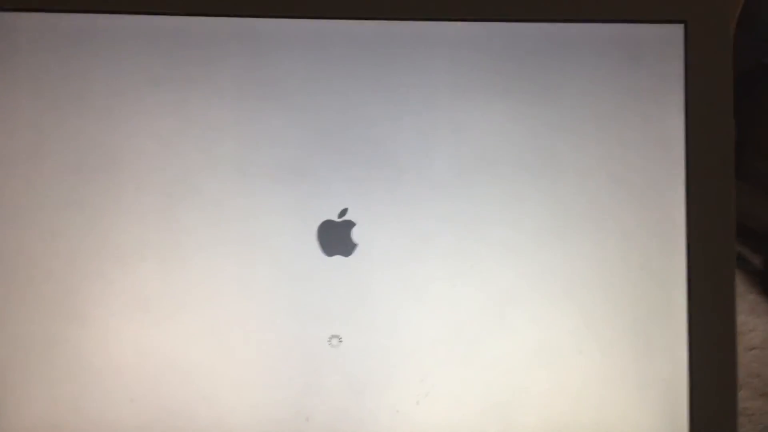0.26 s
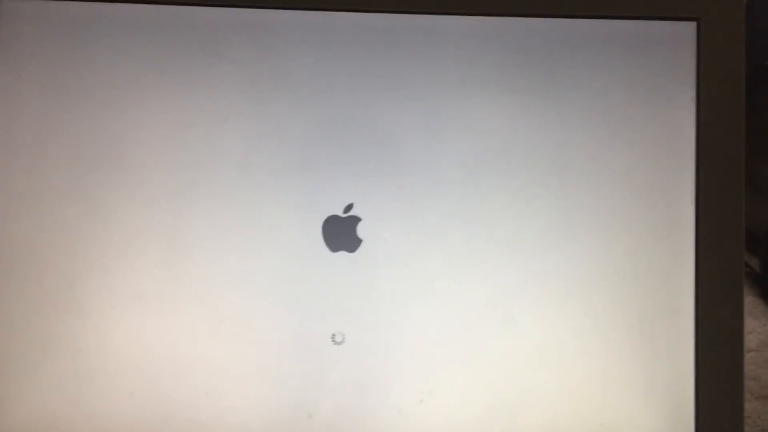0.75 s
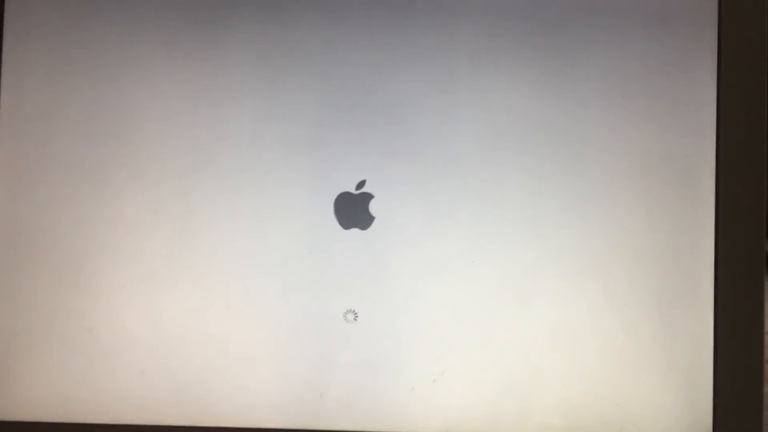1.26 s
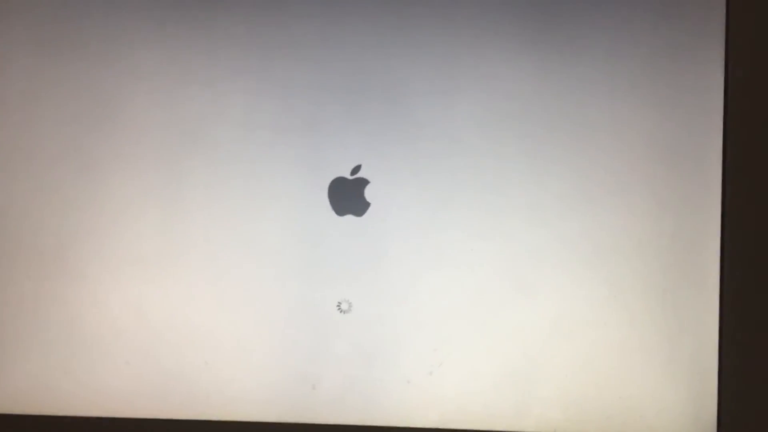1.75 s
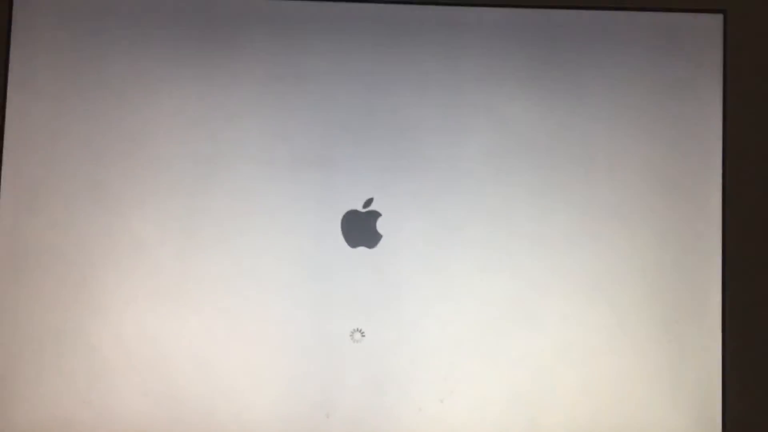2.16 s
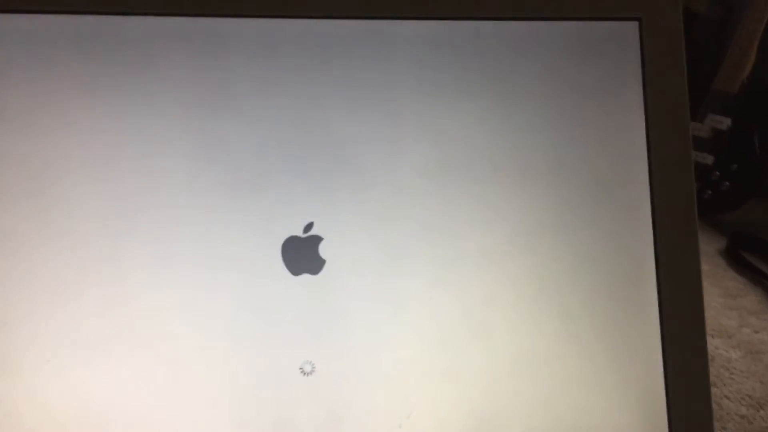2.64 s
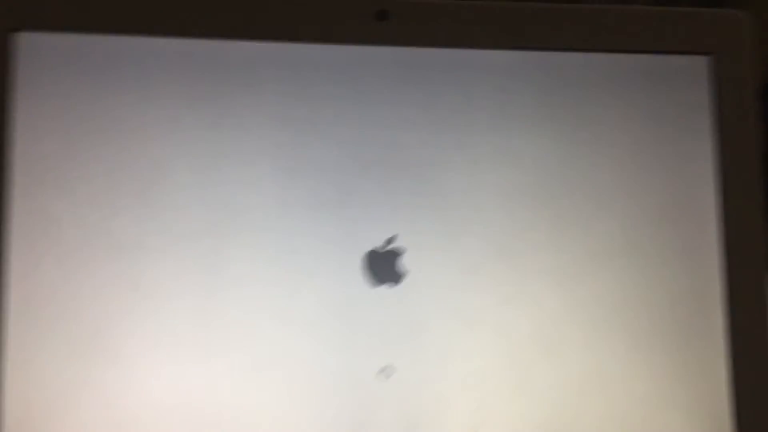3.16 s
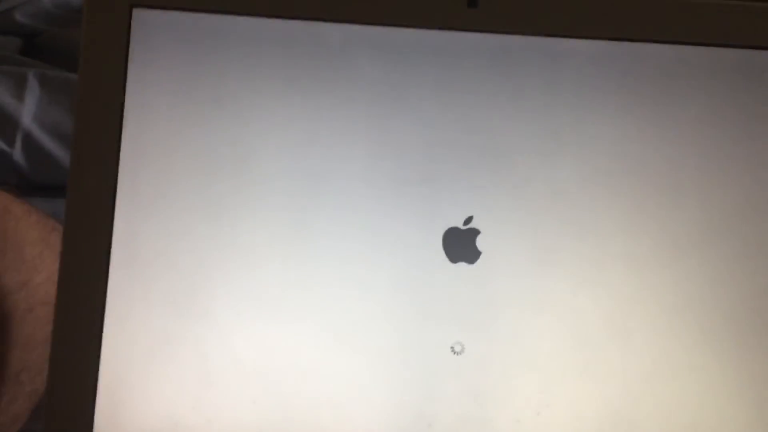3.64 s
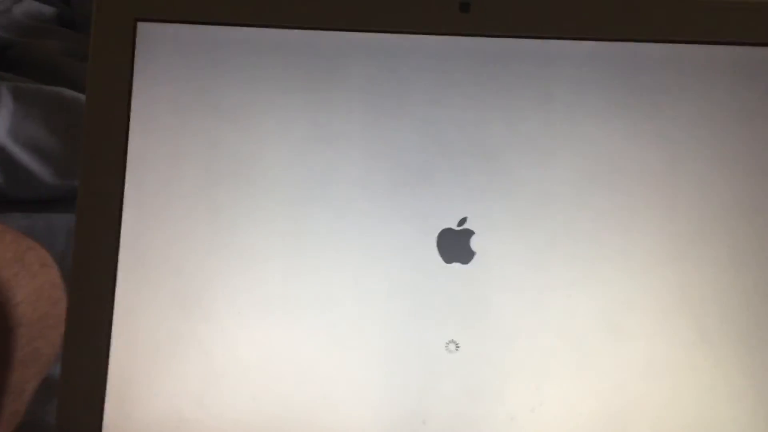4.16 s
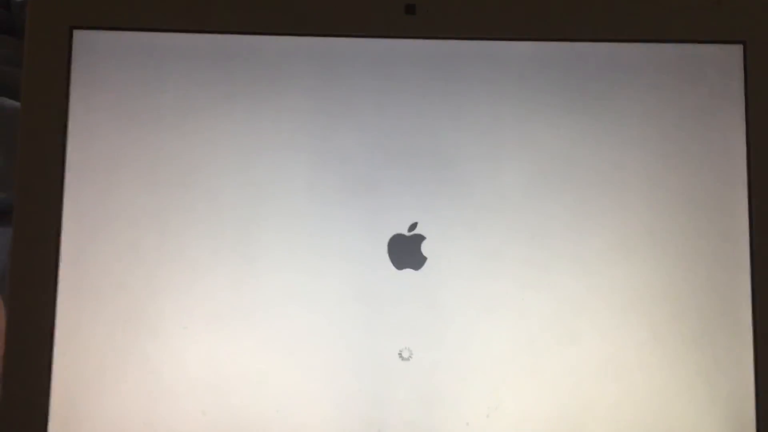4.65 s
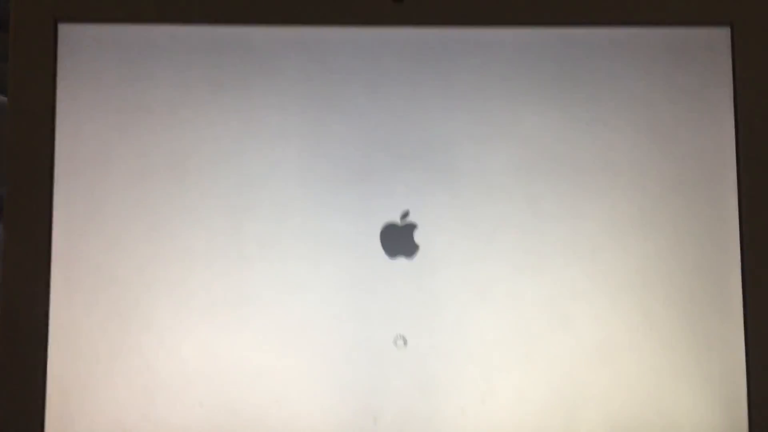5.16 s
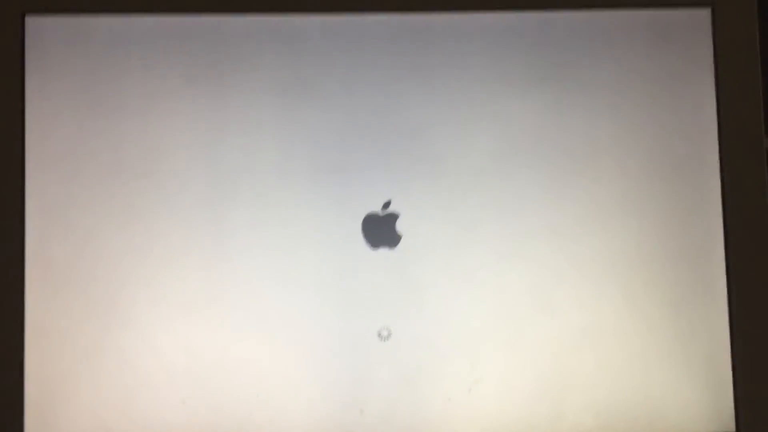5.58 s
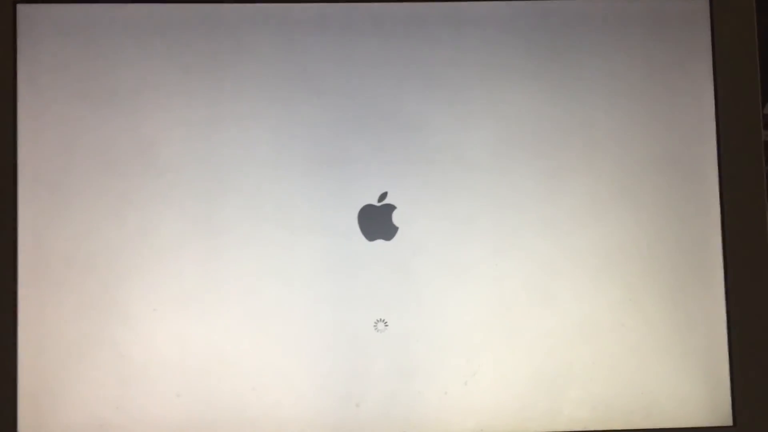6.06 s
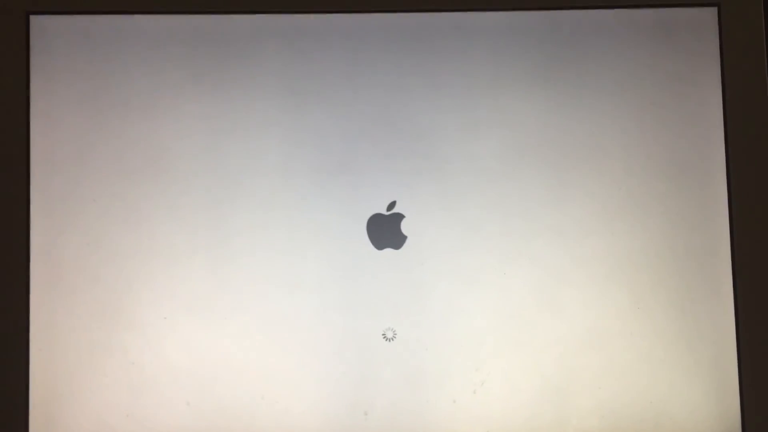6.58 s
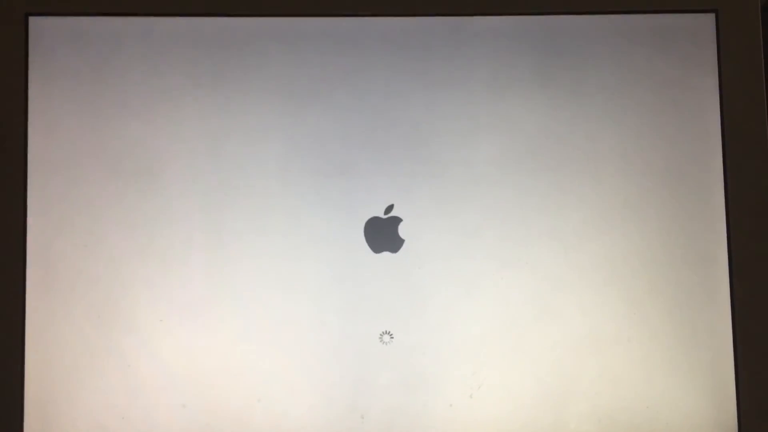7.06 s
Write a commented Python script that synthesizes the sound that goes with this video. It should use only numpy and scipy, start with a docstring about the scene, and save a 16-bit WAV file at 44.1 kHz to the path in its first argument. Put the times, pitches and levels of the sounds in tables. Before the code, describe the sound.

A worn laptop fan runs close to the microphone, humming and rattling in a fast, even pattern as it rubs its housing. The case rings with a buzzy tone and fine, hissing ticks. The rubbing turns briefly rougher several times as the laptop is tilted. Behind it are a steady rush of vent air and a faint hard drive whine, with a few small handling clicks and soft bumps in the first half.

```python
"""A worn laptop fan hums and rattles close by, in a pattern that repeats 16 times a second.
Its spinning part, the rotor, rubs and strikes the housing: the case rings and the treble ticks.
Tilting the laptop makes it rub harder, and the balance shifts as a hand-held camera moves around it.
Behind the fan are the hiss of air in the vent, the steady tones of the hard drive,
and a few small clicks and soft bumps from handling."""
import sys
import numpy as np
from scipy import signal
from scipy.fft import rfft, irfft, next_fast_len
from scipy.io import wavfile
from scipy.ndimage import uniform_filter1d, map_coordinates

SR = 44100
rng = np.random.default_rng(int(sys.argv[2]) if len(sys.argv) > 2 else 0)


def unload_wav(signal):
    """Save mono or channel-first audio to the path in sys.argv[1] as 16-bit WAV at rate SR, clipped to [-1, 1]."""
    wavfile.write(
        sys.argv[1],
        SR,
        np.round(np.clip(np.atleast_2d(signal).T, -1, 1) * 32767).astype(np.int16),
    )


N = 322812

# A cycle is one round of the rattle pattern: five turns of the rotor.
# The rubs in a cycle: (place in the cycle [0-1], relative knock level [dB], relative tick level [dB])
RUBS = [(0.074, -15.5, -7.5), (0.126, -12, -6), (.21, -5.5, -2), (.279, -7, -5.5), (.311, -7, -7.5),
        (.408, 4, 2.5), (0.448, -0.5, -7), (0.483, -9.5, -5.5), (0.531, -7, -19), (0.608, 1, 0),
        (.648, -1.5, -5), (.683, -6, -3), (0.713, -5, -6), (.854, -11, -7), (0.88, -4, -4.5),
        (.92, -22, -20)]
CALM_CHANCE = 0.16  # how much of the rubbing is random between tilts, 0-1


def rattle(cycle):
    """The rotor's rubs make the case ring, with a different tone from the right and from the left."""
    # The case's ring from each side: (frequency [Hz], relative level [dB])
    case_right = [(60, -88), (200, -41), (600, -23), (850, -28.5), (970, -9), (1250, -17.5), (1430, -4),
                  (1560, -14.5), (1685, -6), (1750, -6), (1850, -8.5), (1950, -14.5), (2250, -12),
                  (2600, -30.5), (3000, -26), (3600, -37)]
    case_left = [(60, -85), (200, -34), (600, -16), (850, -15.5), (970, -12), (1130, -10.5), (1240, -13),
                 (1350, -5), (1590, -10), (1680, -8), (1850, -5.5), (1950, -5), (2250, -10.5),
                 (2600, -25.5), (3000, -34), (3600, -41.5)]
    places, knock_db, _ = np.transpose(RUBS)
    press_db, chance = tilting()
    left = leftward()
    grain = evened(roughness(cycle, chance, memory_cycles=34), 1 / 700)
    force = grain * pressure(cycle, places, knock_db, fade=0.023, rest_db=-12)
    ring = (1 - left) * coloured(force, case_right) + left * coloured(force, case_left)
    ring = evened(ring, 1 / 4)
    power = np.abs(uniform_filter1d(ring ** 2, size=SR // 250))
    softened = ring / (1 + power / 0.95) ** (1 / 3)  # the light rotor gives way, so no rub sticks out far
    return amp(-50 - 2.5 * left + 1.5 * press_db) * unit(softened)


def strikes(cycle):
    """The rotor hits the same spots every cycle: the case buzzes, knocks hollowly and snaps crisply."""
    # Each kind of hit: (place in the cycle [0-1], pitch [Hz], relative peak from the right [dB],
    # from the left [dB], in the dead spot [dB])
    buzz_hits = [(0.0031, 1732, -46, -45, -44), (0.0884, 1662, -45, -43, -41),
                 (0.1244, 1694, -43, -46, -49), (0.2201, 1759, -44, -45, -46),
                 (0.2946, 1771, -38, -43, -48), (0.4172, 1770, -40, -42, -40),
                 (0.4822, 1733, -39, -42, -41), (0.5601, 1679, -43, -43, -45),
                 (0.6186, 1750, -40, -42, -41), (0.6747, 1744, -39, -43, -41),
                 (0.7251, 1795, -46, -44, -44), (0.8972, 1805, -40, -43, -47),
                 (0.9253, 1802, -50, -48, -50)]
    knock_hits = [(0.2158, 1097, -49, -50, -51), (0.2729, 1417, -44, -44, -47),
                  (0.3747, 1144, -50, -48, -49), (0.4581, 1143, -39, -39, -40),
                  (0.5178, 1166, -52, -48, -47), (0.5687, 1133, -45, -46, -47),
                  (0.6378, 1061, -43, -43, -43), (0.6851, 1102, -45, -45, -48),
                  (0.8865, 1482, -39, -43, -46), (0.9533, 954, -49, -52, -51)]
    snap_hits = [(.418, 2650, -55, -58, -55), (.435, 2170, -47, -51, -50), (.62, 2820, -52, -55, -54)]
    left, dead = leftward() ** 2, dead_spot()

    def heard(hits):
        """Blend each hit's three levels by where the camera is."""
        return [(place, (1 - dead) * (right_db + left * (left_db - right_db)) + dead * dead_db, hz)
                for place, hz, right_db, left_db, dead_db in hits]

    buzz = bursts(cycle, heard(buzz_hits), half_s=.0016, scatter_db=1.03, drift=0.21, shake=2.9)
    knocks = bursts(cycle, heard(knock_hits), half_s=.0009, scatter_db=1.3, drift=0.27, shake=3.0)
    snaps = bursts(cycle, heard(snap_hits), half_s=.0009, scatter_db=0.8, drift=.7, shake=4.2)
    return amp(0.37) * buzz + amp(-1) * knocks + amp(-0.1) * snaps


def blade_hum(cycle):
    """The fan blades give a fluttering tone, weaker in a tilt, softer and purer in the dead spot."""
    # The tone's swells: (place in the cycle [0-1], relative level [dB], pitch [Hz])
    swells = [(.0068, 0, 579), (.1808, 0, 589), (.2834, -10, 520), (.3766, -1, 580), (.4714, -8, 615),
              (.6297, -6, 538), (.7791, -3, 571)]
    core_hz = (548, 572)
    _, chance = tilting()
    dead = dead_spot()
    blades = unit(bursts(cycle, swells, half_s=.0035, scatter_db=0.68, drift=0.028, shake=1.4))
    core = signal.sosfiltfilt(signal.butter(2, core_hz, "bandpass", fs=SR, output="sos"), blades)
    flutter = blades - core
    level_db = -50 - 1.03 * leftward() - 3.5 * dead - 5.5 * (chance - CALM_CHANCE)
    return amp(level_db) * (blades - 0.5 * dead * flutter)


def drone(cycle):
    """The unbalanced rotor drones; its tone at four times the turning rate is louder from the left."""
    # The drone's tones: (pitch [multiple of the cycle rate], level [dB])
    tones = [(15, -71), (17, -75), (18, -68), (19, -71), (24, -76.5), (25, -61.5), (26, -69.5), (27, -70),
             (45, -73.5), (49, -69), (50, -71.5), (60, -68.5)]
    body = rotor_tones(cycle, tones, waver_db=-0.3, drift=0.08)
    fourth = rotor_tones(cycle, [(20, -69.5)], waver_db=1.2, drift=0.055)
    return np.std(body) * evened(body, 1 / 35) + amp(4.5 * leftward() + 2.5 * dead_spot()) * fourth


def ticks(cycle):
    """Each rub also gives a short hissing tick, whose bright edge is heard mostly from the left."""
    # The tone of the tick and of its bright edge: (frequency [Hz], relative level [dB])
    tick_colour = [(100, -59), (1500, -5), (2800, 0.5), (3600, -5), (5500, 5), (7300, 0.5), (8500, -9.5),
                   (10000, -0.5), (11600, -1), (12500, -6), (15700, -18)]
    edge_colour = [(9000, -66), (11800, -12), (12700, -5), (13500, 0), (14300, -23), (15700, -11)]
    # The camera crosses the narrow beam in which the edge leaves the vent:
    # (time [s], half length [s], gain [dB])
    beam_passes = [(4.75, 0.48, 4), (7.15, .25, 4)]
    places, _, sizes_db = np.transpose(RUBS)
    press_db, _ = tilting()
    left = leftward()
    grit = rng.standard_normal(N) * amp(1.1 * wobble(60))
    tick = coloured(grit * pressure(cycle, places, sizes_db, fade=0.027, rest_db=-31), tick_colour)
    edge_force = pressure(cycle, places, sizes_db, fade=.04, rest_db=-15)
    edge = coloured(rng.standard_normal(N) * edge_force, edge_colour)
    tick_db = -65 + 2 * left + 0.89 * press_db
    edge_db = -85 + 14 * left + bells(beam_passes) - 7 * dead_spot()
    return amp(tick_db) * tick + amp(edge_db) * edge


def squeak(cycle):
    """One rub in every cycle gives a tiny high squeak of varying strength."""
    place, cycle_hz, pitch_hz, half_s = .217, 16, 11700, .0012
    from_peak_s = ((cycle - place + .5) % 1 - .5) / cycle_hz
    ring = unit(wobble(900) * np.sin(2 * np.pi * pitch_hz * np.arange(N) / SR))
    peak_db = -64 + 0.5 * leftward() + 2 * wobble(12)
    return amp(peak_db) * np.exp(-(from_peak_s / half_s) ** 2) * ring


def air():
    """Air rushes through the vent, with a thin high hiss straight in front of it."""
    # The tone of the rush and of the high hiss: (frequency [Hz], relative level [dB])
    rush_colour = [(20, -27), (55, -23), (100, -9.5), (160, 0), (350, 7), (1000, 6), (2700, 1), (3600, -7),
                   (4200, 0.5), (5200, 1.5), (6400, 1), (7500, -6), (8500, -16), (10000, -10), (13000, -20),
                   (15700, -22)]
    hiss_colour = [(6500, -39), (7200, -5), (7500, 14), (7800, 3), (8500, -34)]
    # The camera passes in front of the vent: (time [s], half length [s], level [dB])
    vent_passes = [(1.7, .6, -70), (4.75, 0.42, -70.5), (5.45, 0.36, -77)]
    rush_db = -55 - 0.22 * np.arange(N) / SR  # the camera drifts away from the vent
    rush = amp(rush_db) * coloured(rng.standard_normal(N), rush_colour)
    hiss_gain = sum(amp(db) * bell(s, half) for s, half, db in vent_passes)
    return rush + hiss_gain * coloured(rng.standard_normal(N), hiss_colour)


def hard_drive():
    """The drive hums and whines; its motor's whistle grows as the camera passes through its wide beam."""
    # Tones of the drive and the electronics: (pitch [Hz], level from the right [dB])
    whines = [(77.8, -79.5), (120, -82.5), (4765, -86), (7484, -88), (9745, -86)]
    whistle_hz = 3742
    t = np.arange(N) / SR

    def tone(hz):
        """A pure tone, less steady the higher it is."""
        return np.sqrt(2) * np.sin(2 * np.pi * hz * t + hz / 9000 * wobble(9))

    steady = sum(amp(db) * tone(hz) for hz, db in whines)
    whistle_db = -81 + 8 * bell(3.3, 2.4) + 1.2 * wobble(5.14)
    return amp(whistle_db) * tone(whistle_hz) + amp(-1.4 * leftward()) * steady


def handling():
    """Handling the case makes dry clicks and dull bumps."""
    # Clicks: (time [s], level [dB], centre pitch [Hz], width [octaves], time to fade by 60 dB [s])
    clicks = [(2.211, -41, 3900, .42, .016), (.882, -54.5, 12000, .4, .11), (1.108, -55.5, 4400, .15, .24)]
    # Bumps: (time [s], level [dB], pitch [Hz])
    bumps = [(.92, -54, 165), (1.15, -55, 150), (2.355, -49.5, 225)]
    out, t = np.zeros(N + SR), np.arange(SR // 4) / SR
    octave = np.log2(np.fft.rfftfreq(len(t), 1 / SR) + 1)
    for s, db, hz, width, fade_s in clicks:
        band = np.exp(-.5 * ((octave - np.log2(hz)) / width) ** 2)
        noise = irfft(rfft(rng.standard_normal(len(t))) * band, len(t))
        out[round(s * SR):][:len(t)] += unit(noise) * amp(db - 60 * t / fade_s)
    for s, db, hz in bumps:
        loudness = amp(db - 60 * t / 0.1) * (1 - np.exp(-t / 0.0033))
        out[round(s * SR):][:len(t)] += loudness * np.sin(2 * np.pi * hz * t)
    return out[:N]


def screen_echo(x, delay_s=0.001075, sway=0.16, echo_db=-15):
    """Add the echo off the screen; its path changes as the camera sways, shifting the tone of the hiss."""
    lag = delay_s * SR * np.exp(sway * wobble(1.3))
    return x + amp(echo_db) * map_coordinates(x, [np.arange(N) - lag], order=3)


def tilting():
    """Tilts press the rotor on its housing: gives the extra rubbing (dB) and how random it is (0-1)."""
    # Tilts: (time [s], half length [s], extra rubbing [dB], extra randomness [0-1])
    tilts = [(.04, 0.19, 2.4, 0.2), (1.214, 0.28, 1, 0.1), (2.05, 0.33, 2, 0.04), (2.8, 0.16, 1, 0),
             (3.267, 0.09, 3.5, 0.32), (4.363, 0.135, 2, 0.17), (5.487, 0.17, 1.5, 0.09),
             (7.05, 0.5, 1.1, 0.05)]
    press_db = sum(db * bell(s, half) for s, half, db, _ in tilts)
    chance = CALM_CHANCE + sum(share * bell(s, half) for s, half, _, share in tilts)
    return press_db, np.clip(chance, 0, 1)


def leftward():
    """Where the camera is, from 0 (right) to 1 (left)."""
    # The camera's swing: (time [s], how far left [0-1])
    swing = [(0, 0.91), (.4, 0.39), (2.2, 0.24), (2.45, 0.96)]
    return np.clip(curve(swing), 0, 1)


def dead_spot():
    """How deep the camera is (0-1) in a spot that shades the blade tone and the ticks' bright edge."""
    return bell(2.84, 0.42)


def roughness(cycle, chance, memory_cycles, size=2048):
    """The rubbed surface comes round every cycle and slowly changes; chance mixes in fresh noise."""
    keep = np.exp(-1 / memory_cycles)
    noise = rng.standard_normal((size // 8, size))  # one row per cycle
    track = signal.lfilter([np.sqrt(1 - keep ** 2)], [1, -keep], noise, axis=0)
    repeated = map_coordinates(track[size // 16 - 2:].ravel(), [cycle * size], order=3, mode="wrap")
    return np.sqrt(1 - chance) * unit(repeated) + np.sqrt(chance) * rng.standard_normal(N)


def pressure(cycle, places, sizes_db, fade, rest_db, rise=0.0047):
    """How hard the rotor presses: each rub builds fast and dies away (rise and fade are in cycles)."""
    grid = np.linspace(0, 1, 2000)
    age = (grid - np.asarray(places)[:, None] + rise / 2) % 1
    rubs = amp(sizes_db)[:, None] * np.exp(-age / fade) * (1 - np.exp(-age / rise))
    power = np.sum((rubs / rubs.max()) ** 2, axis=0) + amp(rest_db) ** 2
    return np.interp(cycle % 1, grid, np.sqrt(power))


def bursts(cycle, table, half_s, scatter_db, drift, shake):
    """Short tones at set places in the cycle; each differs a little from the last, more so in a tilt."""
    unrest = unsteadiness(drift, shake)
    out, cycle_hz = np.zeros(N), np.gradient(cycle) * SR
    for place, db, hz in table:
        lap = np.round(cycle - place).astype(int)
        age = (cycle - place - lap) / cycle_hz  # in seconds, so the pitch holds at any speed
        on = np.abs(age) < 4 * half_s
        size, shift = rng.standard_normal((2, lap.max() + 2))[:, lap[on]]
        peak = amp(np.broadcast_to(db, N)[on] + scatter_db * size)
        tone = np.cos(2 * np.pi * hz * age[on] + unrest[on] * shift)
        out[on] += peak * np.exp(-.5 * (age[on] / half_s) ** 2) * tone
    return out


def rotor_tones(cycle, table, waver_db, drift):
    """Tones that follow the rotor's speed; each wavers a little in the room, and much more in a tilt."""
    unrest = unsteadiness(drift, shake=2.3)
    out = np.zeros(N)
    for multiple, db in table:
        peak = np.sqrt(2) * amp(db + waver_db * wobble(2.56))
        phase = 2 * np.pi * (round(multiple) * cycle + rng.random())
        out += peak * np.sin(phase + unrest * wobble(6.5))
    return out


def unsteadiness(drift, shake):
    """How far a tone's wave strays (radians): drift when calm, plus shake scaled by the tilt."""
    _, chance = tilting()
    return drift + shake * (chance - chance.min())


def coloured(x, spectrum):
    """Filter x by (Hz, dB) points so that it rings only after each hit; the result has level 1."""
    m = 2 * next_fast_len(N // 2 + SR // 4)
    hz, db = np.transpose(spectrum)
    gain = amp(np.interp(np.log(np.fft.rfftfreq(m, 1 / SR) + 1), np.log(hz), db))
    cepstrum = irfft(np.log(gain))
    cepstrum[1:m // 2] *= 2  # move the ringing from before each hit to after it
    cepstrum[m // 2 + 1:] = 0
    return unit(irfft(rfft(x, m) * np.exp(rfft(cepstrum)), m)[:N])


def evened(x, seconds):
    """x with its level held at 1 over spans of this length."""
    power = np.abs(uniform_filter1d(x ** 2, size=max(int(seconds * SR), 1)))
    return x / np.sqrt(power + 1e-12)


def amp(db):
    """Turn decibels into a gain."""
    return 10 ** (np.asarray(db) / 20)


def unit(x):
    """x scaled to an average (rms) level of 1."""
    return x / np.sqrt(np.mean(x ** 2) + 1e-20)


def curve(points):
    """Straight lines through (time, value) points."""
    return np.interp(np.arange(N) / SR, *np.transpose(points))


def wobble(rate):
    """A smooth random curve through rate points a second."""
    return map_coordinates(rng.standard_normal(int(N * rate / SR) + 4), [np.arange(N) * rate / SR])


def bell(middle_s, half_s):
    """A smooth rise to 1 and fall back."""
    return np.exp(-((np.arange(N) / SR - middle_s) / half_s) ** 2)


def bells(rows):
    """Add up a bell curve for each (time, half length, height)."""
    return sum(height * bell(s, half) for s, half, height in rows)


def scene():
    """One turning rotor times all the fan's sounds; air, hard drive and handling lie behind them."""
    # The fan's speed: (time [s], rate [cycles per second])
    speed = [(0, 15.98), (1, 16.02), (1.8, 16.03), (2.3, 15.96), (7.32, 15.995)]
    # The rotor runs ahead in a tilt and is pulled back: (time [s], half length [s], lead [cycles])
    surges = [(.03, .19, .033), (1.05, .25, .01), (2.05, .12, .005), (3.45, .14, .021), (4.35, .15, .005),
              (5.15, .3, .009), (5.45, .14, .015), (6.55, .35, .009), (7.05, .15, .009)]
    slip_s, slip_length_s, slip_cycles = 3.2, .2, .1714  # once, the pattern slips ahead round the rotor
    cycle = np.cumsum(curve(speed)) / SR + bells(surges)
    slipped = np.clip((np.arange(N) / SR - slip_s) / slip_length_s, 0, 1)
    rub_cycle = cycle + slip_cycles * slipped
    case = rattle(rub_cycle) + strikes(rub_cycle)
    hiss = screen_echo(ticks(rub_cycle) + squeak(rub_cycle) + air())
    hum = drone(cycle) + blade_hum(rub_cycle)
    return (case + hum + hiss + hard_drive() + handling())[None]


def record(dry):
    """The camera picks up nothing above its highest frequency."""
    top_hz = 15750
    m = next_fast_len(N + SR // 2)
    return irfft(rfft(dry, m) * (np.fft.rfftfreq(m, 1 / SR) < top_hz), m)[:, :N]


dry = scene()
out = record(dry)
unload_wav(out)
```